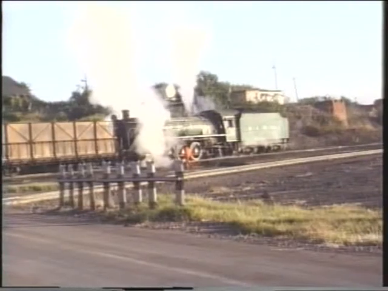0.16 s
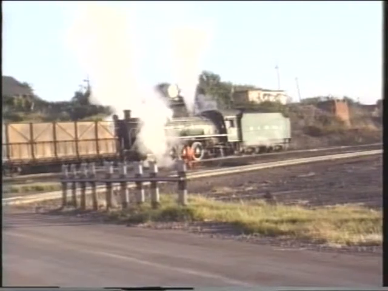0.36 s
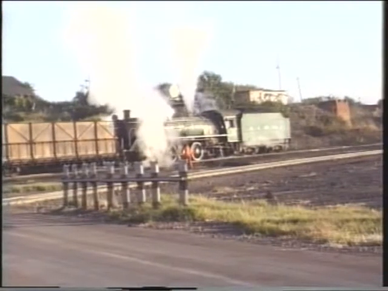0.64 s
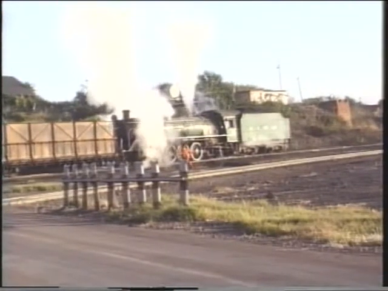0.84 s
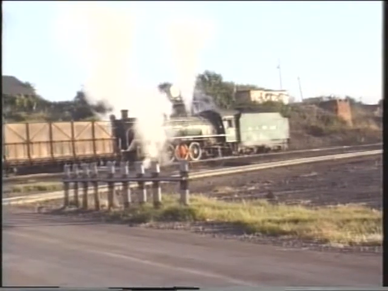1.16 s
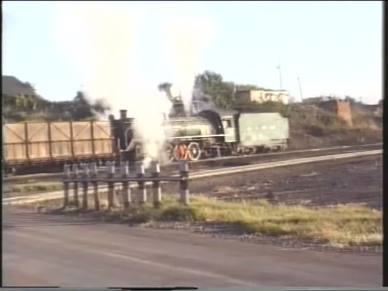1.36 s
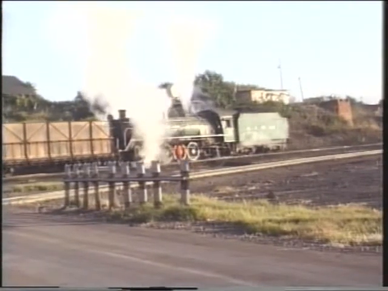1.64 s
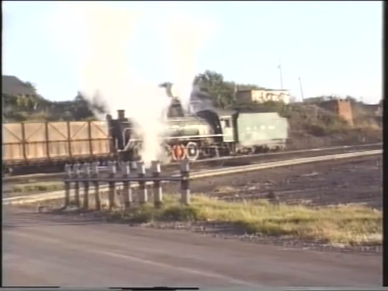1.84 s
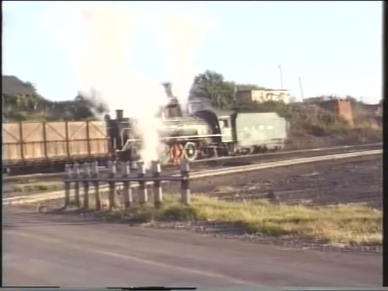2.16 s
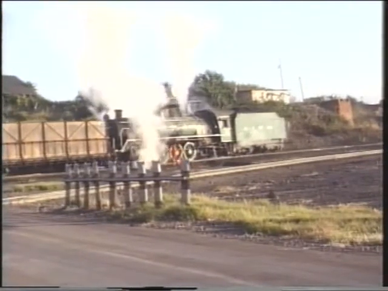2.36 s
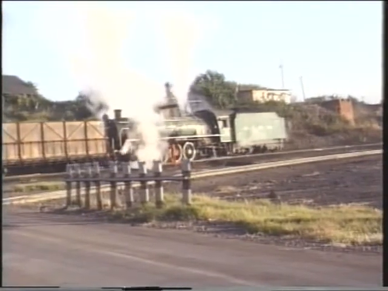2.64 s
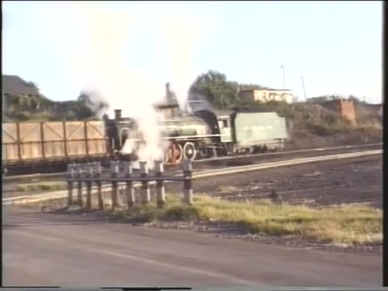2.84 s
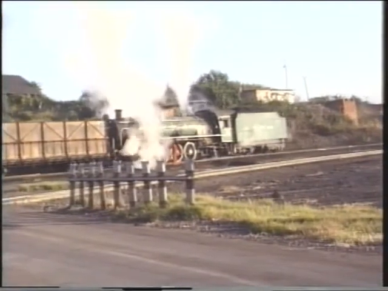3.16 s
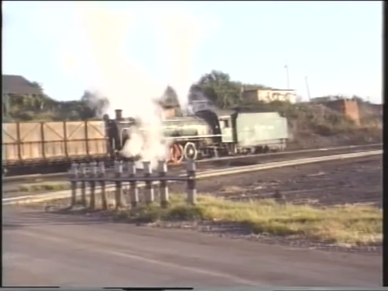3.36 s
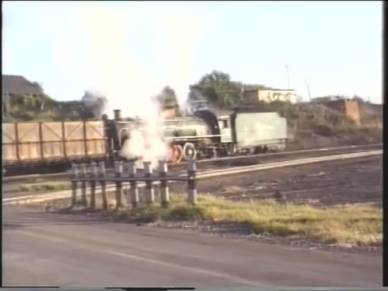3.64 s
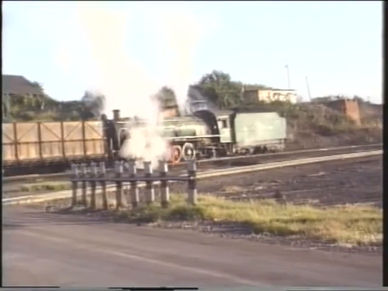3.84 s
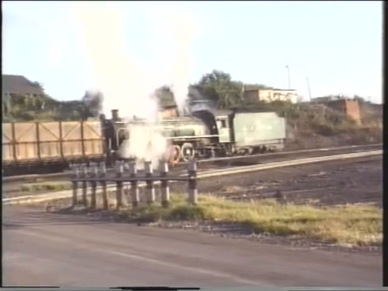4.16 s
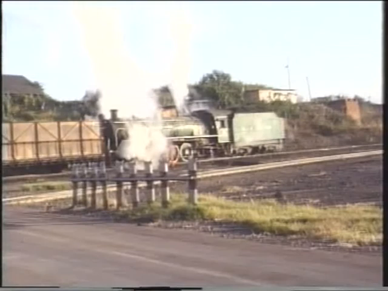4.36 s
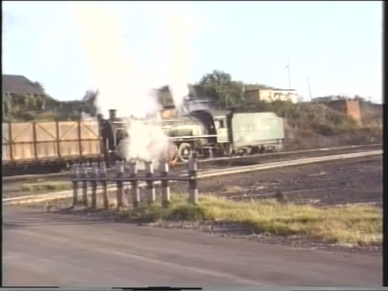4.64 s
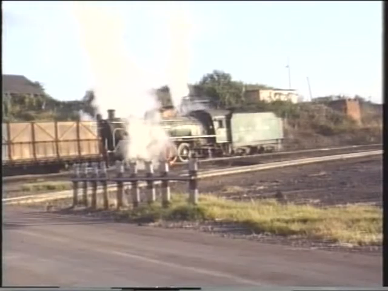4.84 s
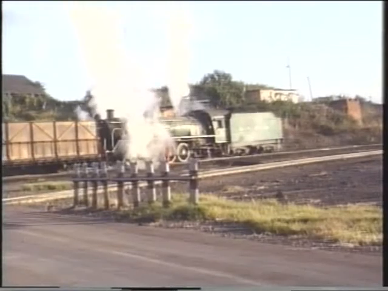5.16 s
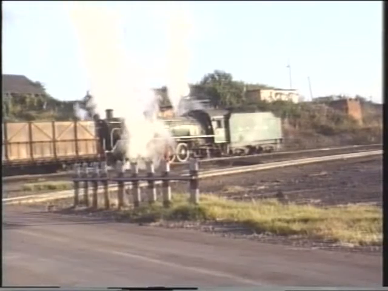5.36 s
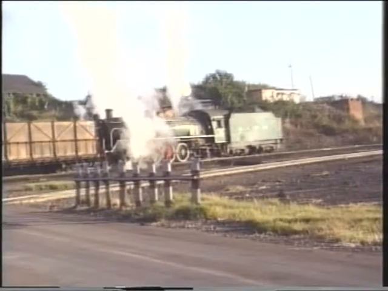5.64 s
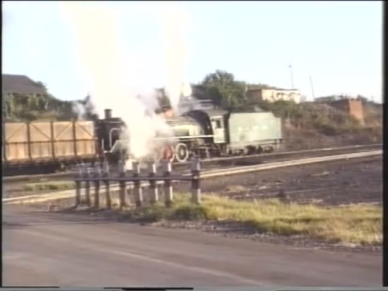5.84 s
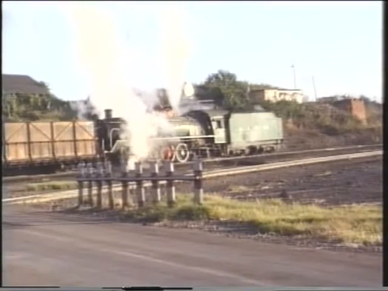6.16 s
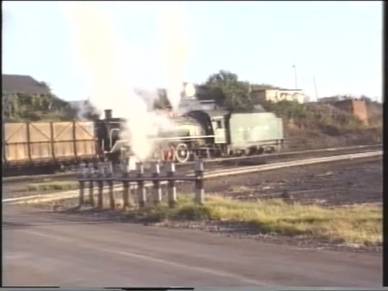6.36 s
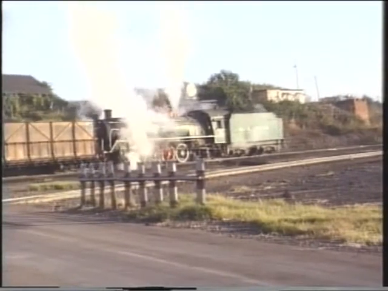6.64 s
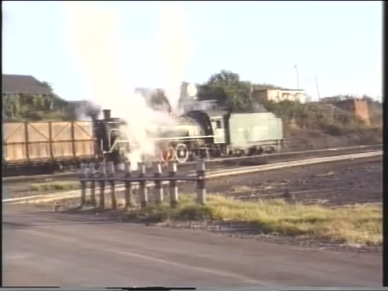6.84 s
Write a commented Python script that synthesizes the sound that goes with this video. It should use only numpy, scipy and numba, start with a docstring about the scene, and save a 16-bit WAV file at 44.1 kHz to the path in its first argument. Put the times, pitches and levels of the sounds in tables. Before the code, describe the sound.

Steam hisses continuously from a slow locomotive outdoors, heard from a distance on one fixed microphone. Loud, hollow exhaust blasts break through roughly once a second, and the hiss dips under each one. Beneath them runs a low, even rumble of rolling wagons. Around the middle comes one soft hollow knock close by, then later a louder knock and a quiet one.

```python
"""Steam locomotive at walking pace

A heavy train, some way off across open ground, on one microphone. About once a second a blast of
exhaust rings the smokebox and chimney; between the beats steam hisses from the open cylinder cocks
and the wagons rumble on the rails. Three small, hollow knocks sound close by.
The recorder's limiter ducks the hiss under each beat."""
import sys
import numpy as np
from scipy import signal
from scipy.fft import rfft, irfft
from scipy.io import wavfile
from scipy.ndimage import map_coordinates
from numba import njit

SR = 44100
rng = np.random.default_rng(int(sys.argv[2]) if len(sys.argv) > 2 else 0)


def generate_wav(signal):
    """Clip the signal to [-1, 1] and save it as 16-bit WAV at the path in sys.argv[1]."""
    frames = np.transpose(np.atleast_2d(signal))
    scaled = np.clip(frames, -1, 1) * 32767
    pcm = np.round(scaled).astype(np.int16)
    wavfile.write(sys.argv[1], SR, pcm)


N = 308700
TIME = np.arange(N) / SR
FREQ = np.maximum(np.arange(N // 2 + 1) * SR / N, 1)


def undb(db):
    """Decibels to gain."""
    return 10 ** (np.asarray(db) / 20)


def turbulence(gain):
    """Noise of rms 1, its spectrum shaped by a gain at each frequency."""
    noise = irfft(rfft(rng.standard_normal(N)) * gain, N)
    return noise / np.sqrt(np.mean(noise ** 2))


def colour(points):
    """Gain at each frequency from points (f/Hz, level/dB)."""
    hz, db = np.transpose(points)
    return undb(np.interp(np.log(FREQ), np.log(hz), db))


def cavity(modes):
    """Gain of resonances (f/Hz, width/Hz, level/dB) whose powers add."""
    return np.sqrt(sum(undb(db) ** 2 / (1 + ((FREQ / hz - hz / FREQ) * hz / width) ** 2)
                       for hz, width, db in modes))


def wander(rate_hz):
    """Slow random motion of rms 1, mostly below rate_hz."""
    return turbulence(1 / (1 + (FREQ / rate_hz) ** 4))


def flutter(rate_hz, depth_db):
    """A gain that wavers at random."""
    return undb(depth_db * wander(rate_hz))


def gusts(x, rate_hz, share):
    """Hot and cool gas pull a cavity's resonances up and down by a small share."""
    speed = 1 + share * wander(rate_hz)
    return map_coordinates(x, [np.cumsum(speed)], mode="mirror")


def cylinder_cocks(sharpens_db=-35.5):
    """Wet steam hisses, rings and sizzles at the nozzles; the cloud's roar sharpens as it blows harder."""
    # surges of steam: t/s, hiss level/dB, roar re hiss/dB, sizzle re hiss/dB
    surges = [(0, -39.5, 1.9, -7), (.3, -38.5, -1, -8.5), (.48, -37.5, -1, -7), (.75, -39, -0.5, -7),
              (1.12, -40, -0.5, -8.5), (1.33, -39.5, -1, -8.5), (1.45, -37.5, 0.2, -10),
              (1.62, -39, -0.5, -8.5), (1.85, -39.5, 2.5, -7), (2.05, -36, 1.5, -9), (2.38, -35.5, 1.5, -9),
              (2.66, -36.5, -0.5, -8.5), (2.96, -36.5, 0, -8.5), (3.3, -36.5, -0.3, -8.5),
              (3.85, -37, 0.2, -7.5), (4.1, -39, 2.5, -9.5), (4.32, -39, -0.7, -9), (4.7, -38, 0, -8),
              (5.198, -39.5, -0.5, -6), (5.38, -38, -1.5, -8), (5.68, -39.5, -3, -7.5),
              (6.2, -40, 0.6, -8.5), (6.5, -39, -0.5, -9.5), (6.63, -38.5, -5, -5.5),
              (6.85, -39, 0.2, -9.5), (7, -34.5, -0.5, -7)]
    # faint ring of the drain pipes: f/Hz, width/Hz, level/dB
    pipe_modes = [(1693, 100, 2.5), (2760, 100, -5.5), (3690, 100, -8.5), (4890, 82, -1), (6700, 380, -8),
                  (8050, 160, -14)]
    # spectra of the steam at the nozzles and in the cloud: f/Hz, relative level/dB
    hiss_spectrum = [(1200, -24.5), (2100, -10), (2550, -1.5), (3200, -0.5), (3650, -0.5), (4750, -1.5),
                     (5200, -2), (5900, -4.5), (7000, -18.5), (10000, -42.5)]
    sizzle_spectrum = [(4000, -16.5), (5700, -6.5), (6300, -0.5), (6900, 0.5), (7600, -4), (8500, -8.5),
                       (9400, -10.5), (10300, -48)]
    soft_spectrum = [(200, -33), (480, -11.5), (760, -7.5), (880, -5.5), (1230, -.5), (1420, -1.5),
                     (1620, -1.3), (1860, -2), (2010, -1.4), (2250, -7), (3500, -31)]
    sharp_spectrum = [(700, -19), (1200, -8.5), (1550, 2.5), (1800, -1), (2000, 3), (2200, 0.5), (2550, 0),
                      (2900, -6.5), (4000, -23)]
    times, *levels_db = np.transpose(surges)
    flow, roar_share, sizzle_share = (undb(np.interp(TIME, times, db)) for db in levels_db)
    hiss = turbulence(colour(hiss_spectrum))
    ring = gusts(turbulence(cavity(pipe_modes)), rate_hz=3, share=0.004) * undb(-10)
    sizzle = turbulence(colour(sizzle_spectrum)) * sizzle_share * flutter(rate_hz=17, depth_db=0.56)
    sharpness = (flow * roar_share / undb(sharpens_db)) ** 2  # 1 is half soft, half sharp
    soft_roar = turbulence(colour(soft_spectrum))
    sharp_roar = turbulence(colour(sharp_spectrum))
    roar = (soft_roar + sharpness * sharp_roar) / np.sqrt(1 + sharpness ** 2)
    nozzles = (hiss + ring + sizzle) * flutter(rate_hz=52, depth_db=0.32)
    return flow * (nozzles + roar * roar_share)


def glancing_echoes(x, echo_db, drift_s, count=5):
    """Ground, rails and boiler return the hiss a few ms late; the paths creep as the engine moves."""
    out = x
    for late, speed in rng.uniform(0, 1, (count, 2)):
        lag_s = 0.002 + 0.009 * late + drift_s * (2 * speed - 1) * TIME / TIME[-1]
        out = out + undb(echo_db) * np.interp(TIME - lag_s, TIME, x)
    return out / np.sqrt(1 + count * undb(echo_db) ** 2)


def wagons(start_db=-51, approach_db_per_s=0.13):
    """Wheels rumble on the rails under an even rolling noise, slowly nearing the microphone."""
    # spectra of the wheels on the rails: f/Hz, relative level/dB
    rumble_spectrum = [(24, -10), (38, -20), (70, -17), (110, -6), (165, -2), (210, -0.5), (275, 1),
                       (350, -2), (460, -6), (800, -20.5)]
    rolling_spectrum = [(300, -18.5), (480, -2.5), (680, 6), (860, 3), (1080, -1), (1600, -23.5)]
    rumble = turbulence(colour(rumble_spectrum)) * flutter(rate_hz=9, depth_db=0.7)
    rolling = turbulence(colour(rolling_spectrum)) * undb(0.5)
    return (rumble + rolling) * undb(start_db + approach_db_per_s * TIME)


def stroke(t, rise_s, sag_db, open_s, close_s):
    """Flow of one beat: the port opens, the flow sags (swells, if sag_db < 0), then dies away."""
    opening = 1 - np.exp(-np.maximum(t, 0) / rise_s)
    sag = undb(-sag_db * np.clip(t / open_s, 0, 1))
    closing = np.exp(-np.maximum(t - open_s, 0) / close_s)
    return opening * sag * closing


def ground_dip(hz=470, width_hz=55, depth_db=5):
    """Gain of the notch where the ground bounce cancels the chimney's direct sound at the microphone."""
    return undb(-depth_db / (1 + ((FREQ - hz) / width_hz) ** 2))


def exhaust(leak_lead_s=0.045, bark_lag_s=0.006, boom_lag_s=0.003):
    """The valve leaks, then opens: the blast pipe thuds and chuffs; jet, smokebox and chimney follow."""
    # one beat per piston stroke: t/s, level/dB, valve open/s, smokebox bark/dB, its sag/dB,
    # chimney boom/dB, its swell/dB, jet rasp/dB (bark, boom and rasp are offsets to the level)
    beats = [(0.667, -23.5, 0.24, 1.5, 6, 3.5, -0.5, 0.5), (1.742, -23, 0.2, 3.5, 9, -2, 5.5, 2),
             (2.698, -23.5, 0.2, 0.5, 6.5, 0.5, 3.5, 2.5), (3.908, -23, 0.2, 0.3, 6.5, -2.5, 6, -2),
             (5.355, -22, .22, 0.5, 5.5, -2.5, 6, -0.5), (6.548, -23, 0.22, 3.5, 9.5, -4, 6.5, 3)]
    # resonances along the steam's way out: f/Hz, width/Hz, level/dB
    blast_pipe = [(282, 250, -5.5), (630, 530, -3.5), (770, 91, -8.5), (1030, 170, -17)]
    smokebox = [(1185, 110, -3.5), (1275, 92, -1.5), (1390, 150, -4.5), (1500, 170, -1.5), (1700, 140, 0)]
    chimney = [(138, 22, -4), (163.4, 30, 4.5), (212, 22, -5.5), (273, 45, 0.5), (391, 34, 0),
               (660, 88, -4.5)]
    # spectrum of the blast jet: f/Hz, relative level/dB
    rasp_spectrum = [(30, -10.5), (70, -9), (200, -11.5), (1000, -4.5), (1950, 0.5), (2380, 5),
                     (2900, -1.3), (3600, -7), (4400, -7.5), (6500, -22.5), (10000, -45)]
    thud_flow = chuff_flow = bark_flow = boom_flow = rasp_flow = 0
    for start_s, db, open_s, bark_db, bark_sag_db, boom_db, swell_db, rasp_db in beats:
        t = TIME - start_s
        leak = undb(-17) * stroke(t + leak_lead_s, rise_s=0.033, sag_db=0, open_s=leak_lead_s, close_s=0.03)
        thud_flow += undb(db) * stroke(t, rise_s=0.007, sag_db=-3, open_s=0.035, close_s=0.045)
        chuff_flow += undb(db) * stroke(t, rise_s=0.014, sag_db=1.5, open_s=0.81 * open_s, close_s=0.046)
        bark_flow += undb(db + bark_db) * (leak + stroke(
            t - bark_lag_s, rise_s=0.035, sag_db=bark_sag_db, open_s=0.75 * open_s, close_s=0.057))
        boom_flow += undb(db + boom_db) * stroke(
            t - boom_lag_s, rise_s=0.013, sag_db=-swell_db, open_s=0.85 * open_s, close_s=0.051)
        rasp_flow += undb(db + rasp_db) * stroke(
            t, rise_s=0.031, sag_db=2.5, open_s=0.58 * open_s, close_s=0.078)
    mouth = 1 / np.sqrt(1 + (122 / FREQ) ** 10)  # the chimney radiates little below its first mode
    lining = 1 / np.sqrt(1 + (FREQ / 1800) ** 30)  # the smokebox swallows the treble
    outlet = mouth * lining
    thud = turbulence(cavity([(25, 40, 0)])) * thud_flow
    chuff = turbulence(cavity(blast_pipe) * outlet * ground_dip()) * chuff_flow
    bark = gusts(turbulence(cavity(smokebox) * outlet), rate_hz=8, share=0.007) * bark_flow
    air_column = turbulence(cavity(chimney) * outlet * ground_dip())
    boom = gusts(air_column, rate_hz=5.93, share=0.012) * boom_flow
    rasp = turbulence(colour(rasp_spectrum) * ground_dip()) * rasp_flow
    return thud * undb(-39) + chuff * undb(-8) + bark * undb(-3.5) + rasp * undb(-6.3) + boom * undb(-14)


def embankment(x, t60_s, dull_hz, wet_db):
    """Wagons and the bank behind scatter a faint, dull tail."""
    scatter = turbulence(1 / np.sqrt(1 + (FREQ / dull_hz) ** 2))
    tail = scatter * undb(-60 * TIME / t60_s) * np.minimum(TIME / 0.017, 1)
    tail /= np.sqrt(np.sum(tail ** 2))
    return undb(wet_db) * signal.fftconvolve(x, tail[:2 * SR])[:N]


def knocks(contact_s=0.0058):
    """Soft, short pushes on a well damped hollow body near the microphone."""
    # knocks: t/s, level/dB, pitch ratio
    pushes = [(3.446, -32, 0.78), (5.061, -21, 0.99), (5.3, -32, 1.07)]
    # modes of the body: f/Hz, t60/s, level/dB
    modes = [(96, 0.22, -24), (200, 0.05, -14), (418, 0.042, 2), (950, 0.022, 1)]
    out = 0
    for start_s, level_db, pitch in pushes:
        t = np.maximum(TIME - start_s, 0)
        ring = sum(undb(db - 60 * t / t60) * np.sin(2 * np.pi * hz * pitch * t) for hz, t60, db in modes)
        out += undb(level_db) * ring * np.minimum(t / contact_s, 1)
    return out


def scene():
    """The distant train and the close knocks at one microphone, the same in both channels."""
    beats = exhaust()
    steam = glancing_echoes(cylinder_cocks(), echo_db=-23, drift_s=0.0005)
    tail = embankment(beats, t60_s=0.98, dull_hz=1200, wet_db=-24.5)
    mono = steam + wagons() + beats + tail + knocks()
    return np.array([mono, mono])


@njit
def follow(x, attack_s, release_s):
    """Level follower that rises in attack_s and falls in release_s."""
    out, level = np.empty(len(x)), 0.
    for i in range(len(x)):
        level += (x[i] - level) / (SR * (attack_s if x[i] > level else release_s))
        out[i] = level
    return out


def record(dry, limit_db=-19, ceiling_db=-16.5, top_hz=10150):
    """The recorder's limiter holds down the beats, its amplifier rounds the last peaks; the top is cut."""
    peaks = follow(np.abs(dry[0]), attack_s=0.00015, release_s=0.22)
    held = dry / np.maximum(peaks / undb(limit_db), 1)
    rounded = held / (1 + (held / undb(ceiling_db)) ** 6) ** (1 / 6)
    return signal.sosfilt(signal.ellip(10, 0.2, 70, top_hz, fs=SR, output="sos"), rounded)


dry = scene()
out = record(dry)
generate_wav(out)
```